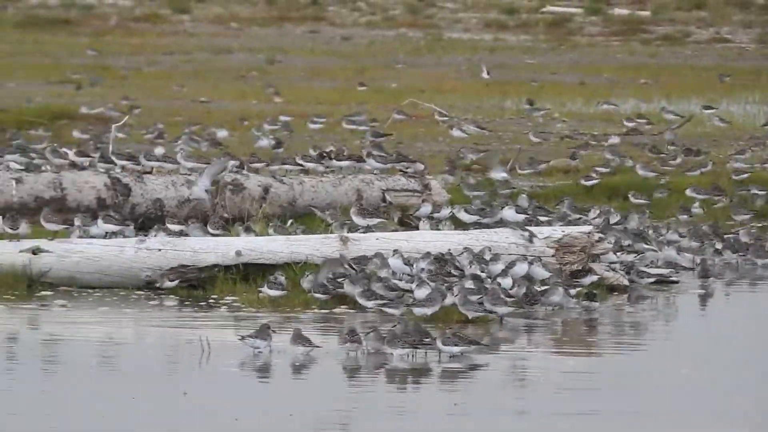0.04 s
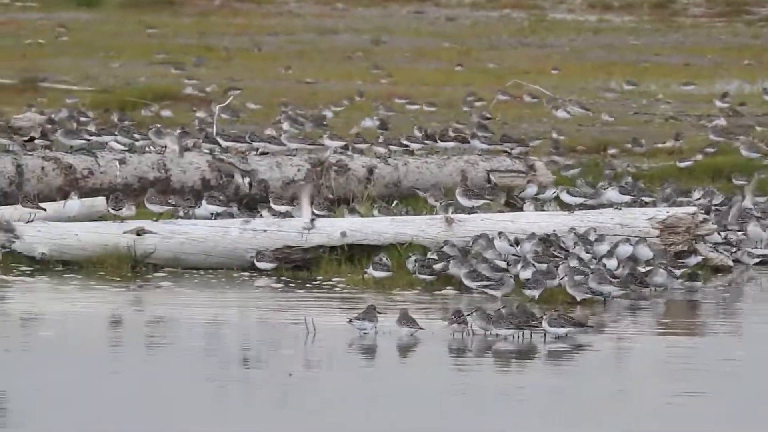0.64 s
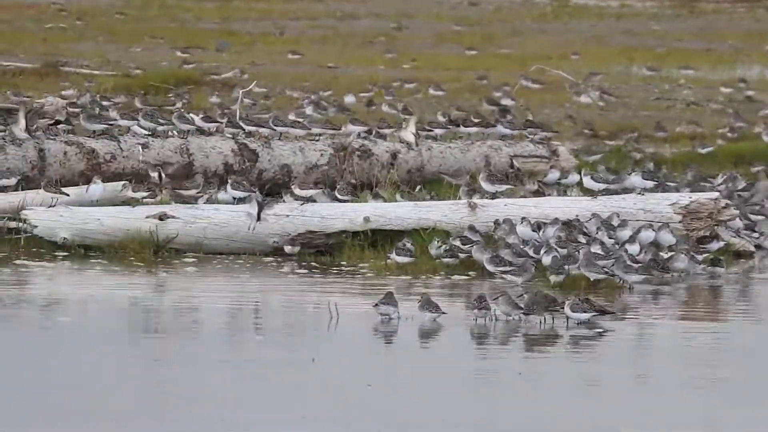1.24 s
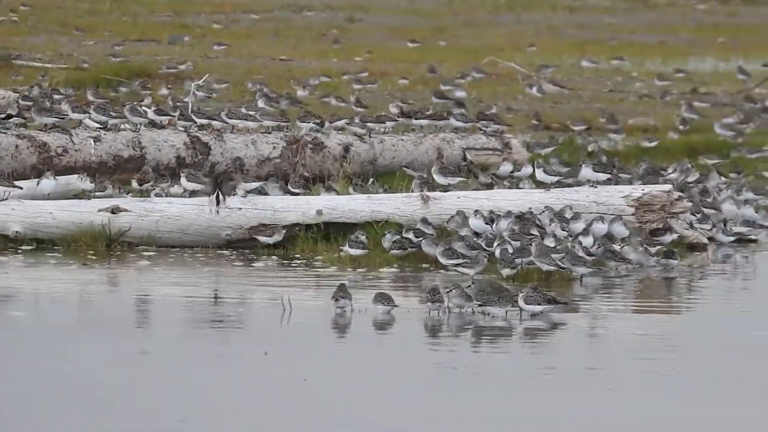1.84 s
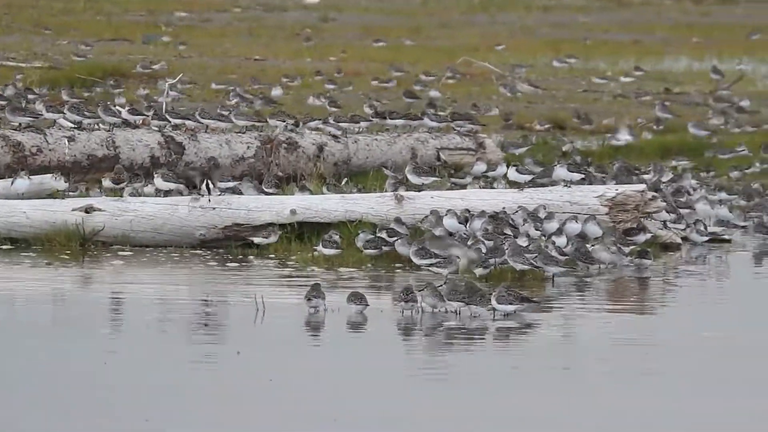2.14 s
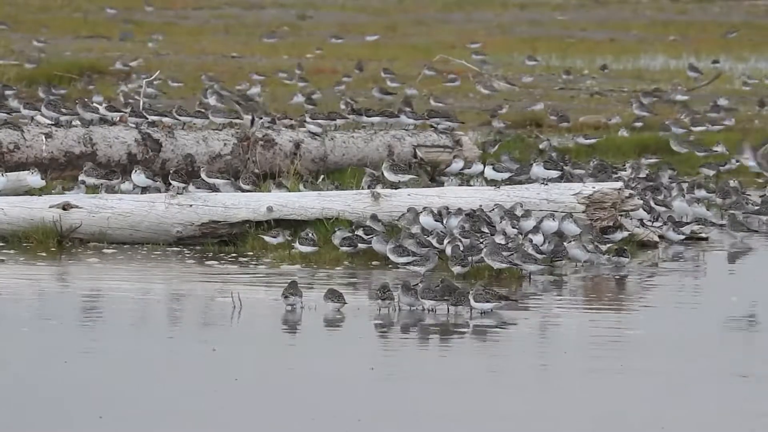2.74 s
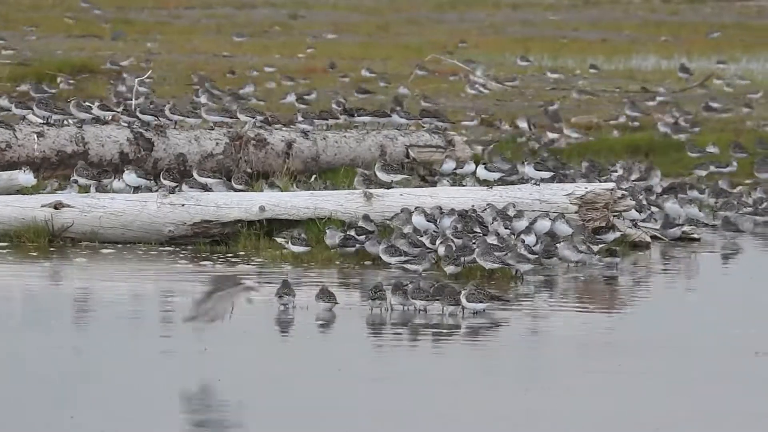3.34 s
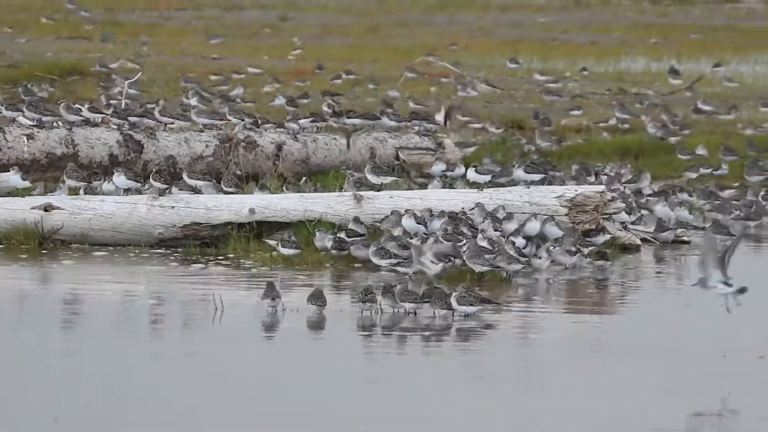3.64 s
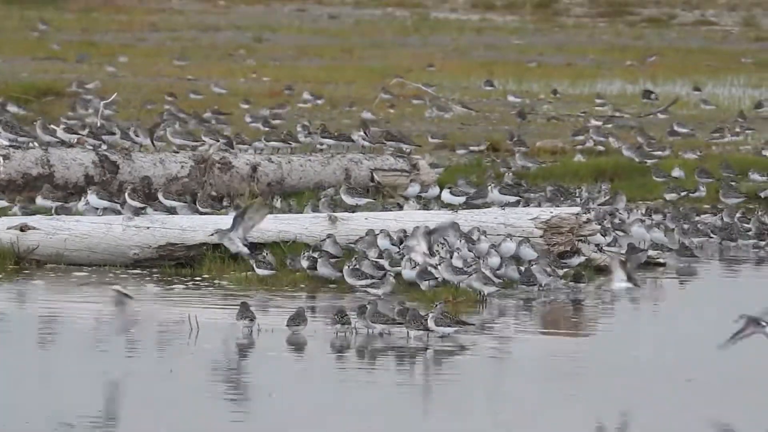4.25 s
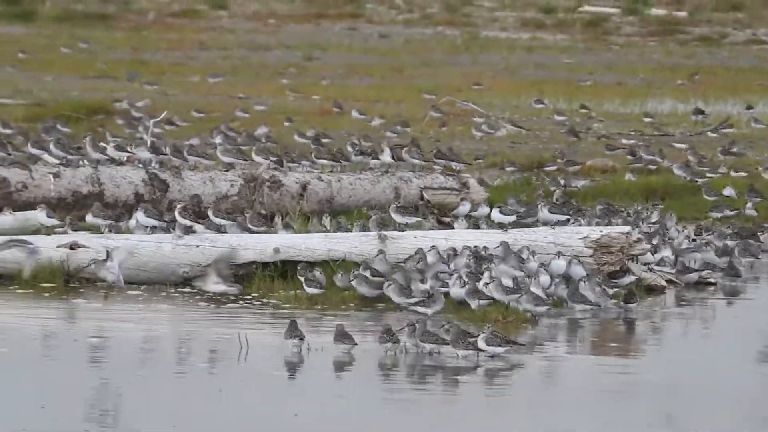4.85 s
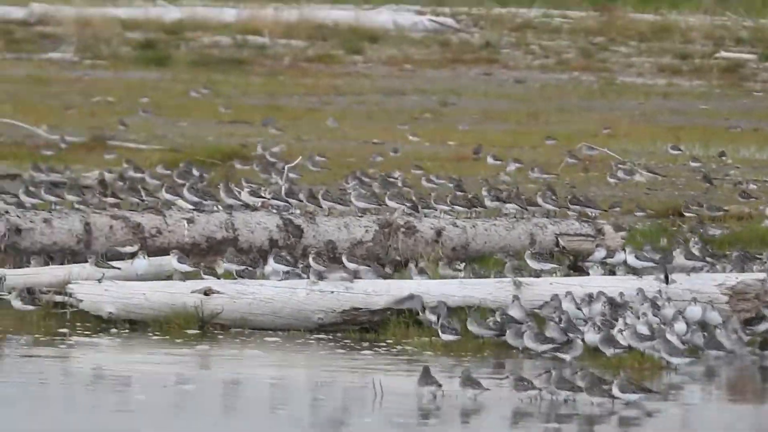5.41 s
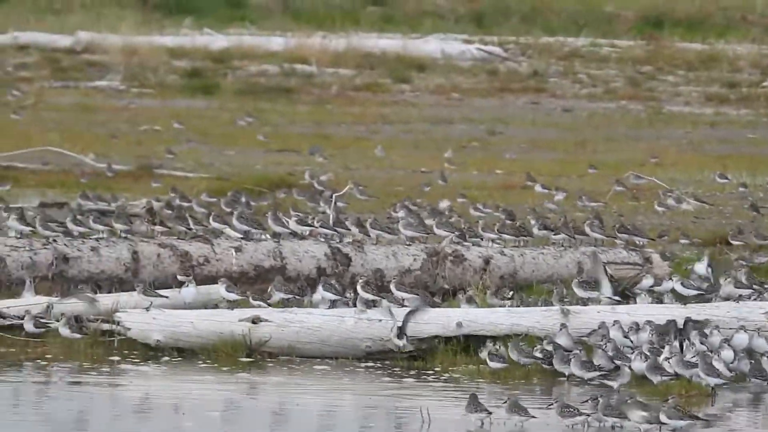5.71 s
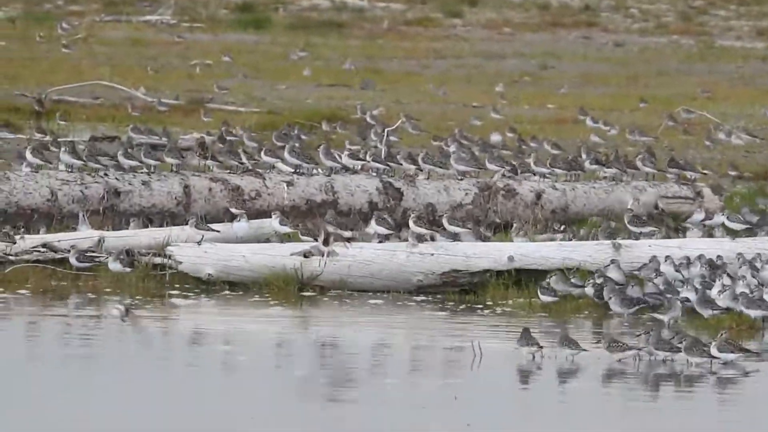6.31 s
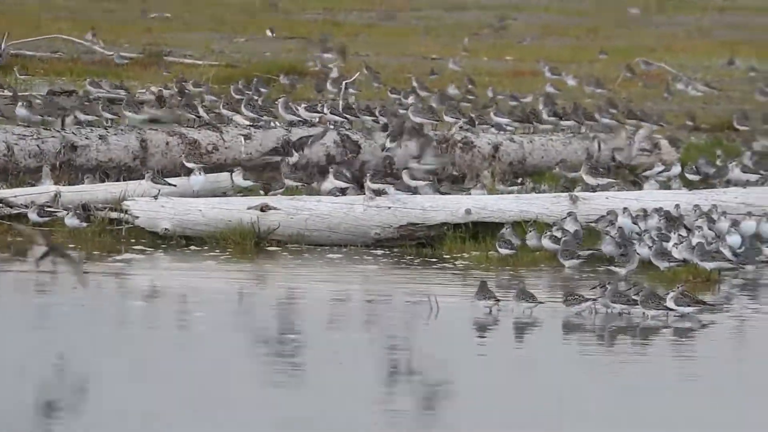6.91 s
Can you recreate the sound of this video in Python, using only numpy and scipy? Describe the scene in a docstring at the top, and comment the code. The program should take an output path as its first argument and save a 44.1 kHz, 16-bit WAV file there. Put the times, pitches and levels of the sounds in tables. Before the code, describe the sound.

Hundreds of small shorebirds twitter continuously on an open marsh shore, with sharp rising chips and soft peeps standing out nearby. About halfway through, a bird rushes past on fluttering wings and the flock grows louder and more excited. Wind rumbles and thumps unevenly on the microphone, building to one strong gust that briefly covers the birds. More wing rushes follow as the chatter continues.

```python
"""A dense roost of small shorebirds twitters on driftwood at a marsh shore. Each call is a near-sine
from the syrinx: rising chips, soft peeps and slurred whistles stand out of the chatter of hundreds.
Birds fly close past, pushing air and hissing through their feathers. Wind eddies buffet the two
microphone ports; the strongest gust makes the gain control duck the flock."""
import sys
import numpy as np
from scipy import signal
from scipy.fft import rfft, irfft
from scipy.io import wavfile
from scipy.ndimage import uniform_filter1d

SR = 44100
rng = np.random.default_rng(int(sys.argv[2]) if len(sys.argv) > 2 else 0)


def store_wav(level_fs):
    """Save 16-bit WAV to argv[1]."""
    pcm = np.round(np.clip(np.atleast_2d(level_fs), -1, 1) * 32767)
    wavfile.write(sys.argv[1], SR, pcm.T.astype(np.int16))


N = 311787
TIME_S = np.arange(N) / SR
BINS_HZ = np.fft.rfftfreq(N, 1 / SR)
SIDES = np.array([[1], [-1]])  # left, right
CHIP_S = .016

# left-right phase of the microphone pair at bearing 1: (frequency [Hz], phase [rad])
PAIR_PHASE = [(1500, 0), (3500, 0.5), (4500, 0.95), (5300, 1.68), (6200, 3.5), (9000, 0), (12000, 3)]
# flock activity: (time [s], high twitter gain [dB], low peeping gain [dB])
FLOCK_ACTIVITY = [(0, -1.5, 2), (1, -1.5, 0), (2.2, -0.5, 2.5), (3.2, -1, 4), (3.6, 4, -1.5),
                  (4.15, 3, 2.5), (4.5, 2.5, 2.5), (5.1, 2, 0.5), (5.5, 3.5, -2.5), (6.3, 2.5, 2.5),
                  (7.07, -1.5, 1)]
# wind strength at the microphone: (time [s], level [dB])
GUST_STRENGTH = [(0, -29.5), (.3, -28.5), (.42, -37), (.72, -33.5), (1.1, -21.5), (1.6, -32.5), (2.65, -26),
                 (3.0, -28.5), (3.6, -26.5), (3.66, -20), (4.05, -21), (4.55, -26), (5.22, -22.5),
                 (5.27, -7), (5.45, -6), (5.53, -21), (5.95, -18.5), (6.11, -27.5), (6.2, -19),
                 (6.7, -22.5), (7.07, -29.5)]


def undb(db):
    """Decibels to gain."""
    return 10 ** (np.asarray(db) / 20)


def unit(x):
    """Scale to rms 1."""
    return x / np.sqrt(np.mean(np.abs(x) ** 2))


def at_hz(table, hz):
    """Interpolate (frequency [Hz], value) on a log-frequency axis."""
    points_hz, values = np.transpose(table)
    return np.interp(np.log(np.maximum(hz, 1)), np.log(points_hz), values)


def curves(table):
    """Columns of a timed table at every sample."""
    times_s, *columns = np.transpose(table)
    return [np.interp(TIME_S, times_s, column) for column in columns]


def add(out, start_s, sound):
    """Mix in a stereo sound."""
    i = int(np.clip(start_s * SR, 0, N - 1))
    out[:, i:i + sound.shape[1]] += sound[:, :N - i]


def progress(length_s):
    """Ramp from 0 to 1."""
    return np.linspace(0, 1, max(int(length_s * SR), 32))


def walk(rate_hz):
    """Random steps, smoothed twice; rms 1."""
    hold = int(SR / rate_hz)
    steps = np.repeat(rng.standard_normal(N // hold + 1), hold)
    return unit(uniform_filter1d(uniform_filter1d(steps, hold), hold)[:N])


def jitter_pair(samples, knot_count):
    """Two random piecewise-linear curves."""
    u, knots = np.linspace(0, 1, samples), np.linspace(0, 1, knot_count)
    return np.array([np.interp(u, knots, row) for row in rng.standard_normal((2, knot_count))])


def noise(spectrum, apart, bearing=1):
    """Coloured stereo noise, rms 1; apart is the power share each port hears alone."""
    white = rfft(rng.standard_normal((3, N)))
    shared = white[2] * np.exp(.5j * SIDES * bearing * at_hz(PAIR_PHASE, BINS_HZ))
    ports = np.sqrt(1 - apart) * shared + np.sqrt(apart) * white[:2]
    return unit(irfft(ports * undb(at_hz(spectrum, BINS_HZ)), N))


def note(hz, db, bearing, rasp=.015):
    """Near-sine from the syrinx along a pitch track, with fast rasp in pitch and level."""
    pitch_jitter, level_jitter = jitter_pair(len(hz), len(hz) // 64 + 3)
    phase = 2 * np.pi * np.cumsum(hz * (1 + rasp * pitch_jitter)) / SR
    swell = signal.windows.tukey(len(hz), .6) * undb(db + 2.5 * level_jitter)
    return swell * np.sin(phase + .5 * SIDES * bearing * at_hz(PAIR_PHASE, hz))


def chip(low_hz, top_hz, db, bearing, length_s, hook, fade_db=3):
    """Note that whips upwards, fading with height; hook is the share spent dipping first."""
    u = progress(length_s)
    rise = np.maximum(u - hook, 0) / (1 - hook)
    dip = np.maximum(hook - u, 0)
    height = rise ** 1.4 + 1.2 * dip ** 1.5
    return note(low_hz + (top_hz - low_hz) * height, db - fade_db * height, bearing)


def peep(length_s, start_hz, end_hz, db, bearing, arch=.038):
    """Gently arched whistle."""
    u = progress(length_s)
    glide_hz = start_hz + (end_hz - start_hz) * u
    return note(glide_hz * (1 + arch * np.sin(np.pi * u) ** 2 - arch / 2), db, bearing)


def roost(chip_count=1900, high_peep_count=460, low_peep_count=850):
    """Hundreds of birds call at random distances and bearings; the furthest blend into hiss."""
    # distant high and low calls: (frequency [Hz], density [dB])
    far_twitter = [(3800, -38), (4300, -0.5), (4800, -0.5), (5800, 4.5), (6600, 1), (7200, -5.5),
                   (8000, -24.5), (10000, -28.5), (15000, -36)]
    far_peeping = [(2200, -20), (2600, -0.5), (2900, -8), (3300, 3), (3550, -13.5), (3900, -9), (4400, -52)]
    # notch and peak between peeps and chips: (frequency [Hz], gain [dB])
    colour = [(3550, 0.5), (3750, 1.5), (3930, -3), (4100, 10.5), (4350, 1)]
    high, low = np.zeros((2, 2, N))
    for when, pitch, sweep, length, hook, far in rng.random((chip_count, 6)):
        hz = 4450 + 2000 * pitch ** .5
        top_hz = min(hz + 100 + 900 * sweep, 7200)
        db = 2.5 * pitch - 11 * far ** .7
        call = chip(hz, top_hz, db, rng.normal(.95, .3), .007 + .01 * length, .65 * hook)
        add(high, when * N / SR, call)
    for when, pitch, sweep, length, far in rng.random((high_peep_count, 5)):
        hz = 4400 + 2200 * pitch ** .7
        db = 3 * pitch - 4 - 13 * far ** .7
        call = peep(.01 + .014 * length, hz, hz + 900 * (sweep - .65), db, rng.normal(.85, .45))
        add(high, when * N / SR, call)
    for when, pitch, sweep, length, far in rng.random((low_peep_count, 5)):
        hz = 3680 - 1150 * pitch ** 1.9
        db = -8 * far ** .6 - 6 * pitch
        call = peep(.012 + .02 * length, hz, hz + 850 * (sweep - .85), db, rng.normal(1, 1))
        add(low, when * N / SR, call)
    high_db, low_db = curves(FLOCK_ACTIVITY)
    twitter = unit(high) + .72 * noise(far_twitter, apart=.35)
    peeping = unit(low) + .8 * noise(far_peeping, apart=.15)
    chatter = twitter * undb(high_db - 34.5) + peeping * undb(low_db - 44)
    return irfft(rfft(chatter) * undb(at_hz(colour, BINS_HZ)), N)


def marsh(level_db=-37.5, drift_db=.5):
    """Steady wash of the open marsh."""
    # ambience: (frequency [Hz], density [dB])
    spectrum = [(60, -5.5), (250, 7.5), (500, 0), (800, -0.5), (1000, 0.5), (1230, -3), (1550, 5),
                (1850, 3.5), (2100, 1.5), (2450, 3.5), (3000, -19), (3500, 0), (4000, -5), (7000, -45),
                (15000, -57)]
    return noise(spectrum, apart=.12) * undb(level_db + drift_db * walk(3.56))


def wind(gain_db=-2.5, eddy_db=4.5, ragged_db=3, brighten=.83, usual_db=-23):
    """Eddies buffet each port; small, high ones come in bursts and grow fastest with the gust."""
    # turbulence at the ports: (frequency [Hz], density [dB])
    buffet = [(25, -46), (60, -15), (90, -18), (125, -3.5), (165, 0.5), (230, -4.5), (300, -9),
              (420, -18.5), (700, -25), (1200, -40), (2500, -51), (9000, -71.5)]
    gust_db, = curves(GUST_STRENGTH)
    port_db = gust_db + 2 * walk(18) + 3 * np.array([walk(45), walk(45)])
    bright_db = brighten * np.minimum(gust_db - usual_db, 5)
    turbulence = rfft(noise(buffet, apart=.67))
    octave = np.clip(np.log2(np.maximum(BINS_HZ, 1) / 170), 0, 2)
    out = 0
    for k in range(3):
        band = irfft(turbulence * np.maximum(1 - np.abs(octave - k), 0), N)
        burst_db = (eddy_db + ragged_db * k / 2) * np.minimum([walk(80), walk(80)], 1)
        out += band * undb(gain_db + port_db + burst_db + np.sqrt(k / 2) * bright_db)
    return out


def squeaks(count=220, lowest_hz=6800, range_hz=1500, excitement=5.6):
    """Thin, very high chips, louder when the flock is excited; the highest are faintest."""
    out = np.zeros((2, N))
    busy_db, _ = curves(FLOCK_ACTIVITY)
    for when, pitch in rng.random((count, 2)):
        i = int(when * N)
        hz = lowest_hz + range_hz * pitch
        db = -47 + excitement * busy_db[i] - 18 * pitch
        add(out, TIME_S[i], chip(hz, hz + 500, db, bearing=.9, length_s=.01, hook=.4))
    return out


def neighbours(count=34, base_hz=5950, base_db=-34):
    """Birds at mid distance chip by turns, each with its own pitch, sweep and level."""
    out = np.zeros((2, N))
    for turn, (when, pitch, loud, sweep, hook) in enumerate(rng.uniform(-1.2, 1, (count, 5))):
        hz = base_hz + 700 * pitch
        start_s = TIME_S[-1] * (turn + .5 + when / 2) / count
        call = chip(hz, hz + 700 + 550 * sweep, base_db + 3 * loud, .9, CHIP_S, .45 + .35 * hook)
        add(out, start_s, call)
    return out


def shore_echo(calls, echo_db, t60_s):
    """Calls plus their brief scatter from logs, bank and water."""
    t = np.arange(SR // 3) / SR
    tail = rng.standard_normal((2, len(t))) * undb(-60 * t / t60_s) * (t > .003)
    echo = signal.fftconvolve(calls, unit(tail) / np.sqrt(len(t)), axes=1)[:, :N]
    return calls + undb(echo_db) * echo


def thump(hz, length_s, db, waver=.11, push=.036):
    """A vortex beats on the ports for a few uneven cycles, harder on one side."""
    u = progress(length_s)
    wobble = jitter_pair(len(u), int(hz * length_s) + 2)
    phase = 2 * np.pi * np.cumsum(hz * (1 + waver * wobble), axis=1) / SR
    balance = 1 + .45 * SIDES * rng.uniform(-1, 1)
    pressure = np.sin(phase) + push * rng.choice([-1, 1])
    return balance * pressure * np.sin(np.pi * u) ** .81 * undb(db)


def vortices(patter_count=110, lowest_hz=300, range_octaves=1.264, patter_s=.011):
    """Hard thumps, plus a patter of small, high ones whose level follows the wind."""
    # hardest vortices: (centre time [s], pitch [Hz], length [s], level [dB])
    thumps = [(0.161, 270, 0.016, -12.5), (0.341, 210, 0.02, -12), (1.371, 151, 0.033, -15),
              (1.866, 184, 0.041, -15.5), (2.507, 162, 0.031, -14.5), (3.285, 384, 0.13, -19.5),
              (3.685, 164.8, 0.049, -7.5), (3.783, 138, 0.021, -9.5), (4.21, 160, 0.11, -22),
              (3.941, 197, 0.017, -9), (4.006, 232.5, 0.082, -9.5), (4.065, 168.7, 0.047, -9.5),
              (4.145, 166, 0.038, -13), (4.29, 151, 0.047, -13), (4.348, 162, 0.03, -14.5),
              (4.905, 174.8, 0.021, -13), (5.137, 172, 0.039, -10), (5.2, 184, 0.028, -8.5),
              (5.26, 187, 0.053, -6.5), (5.385, 367, .16, -1), (5.495, 159, 0.027, -4.5),
              (5.937, 182.6, 0.052, -4.5), (6.183, 199, 0.027, -9), (6.314, 236, 0.018, -10.5)]
    out = np.zeros((2, N))
    gust_db, = curves(GUST_STRENGTH)
    for centre_s, hz, length_s, db in thumps:
        add(out, centre_s - length_s / 2, thump(hz, length_s, db))
    for when, pitch, weak in rng.random((patter_count, 3)):
        i = int(when * N)
        db = gust_db[i] + 4.5 - 5.5 * (weak + pitch)
        add(out, TIME_S[i], thump(lowest_hz * 2 ** (range_octaves * pitch), patter_s, db))
    return out


def near_birds(chip_gain_db=2, chitter_gain_db=5, peep_gain_db=-1, slur_gain_db=-3):
    """Close calls that stand out from the roost."""
    # rising chips: (time [s], lowest pitch [Hz], rise [Hz], level [dB])
    chips = [(0.804, 5230, 1000, -26.5), (.97, 5870, 1400, -19.5), (1.038, 5780, 1500, -18),
             (1.096, 5750, 1600, -21.5), (1.242, 5200, 990, -26), (1.411, 6740, 1400, -31),
             (1.592, 6730, 1200, -33), (1.693, 6130, 800, -25), (2.231, 5760, 1300, -26),
             (2.495, 5960, 1300, -22.5), (3.147, 5200, 1100, -28.5), (4.001, 5440, 700, -20),
             (4.374, 5860, 1460, -14), (4.692, 5980, 800, -20), (5.161, 5950, 600, -25),
             (6.227, 4300, 500, -27), (6.312, 4300, 500, -30.5), (6.351, 5780, 700, -19.5),
             (6.406, 4420, 298, -28), (6.548, 4950, 400, -29), (6.597, 4840, 500, -29.5),
             (6.742, 6180, 600, -20), (6.894, 5680, 900, -14.5)]
    # one bird's run of hooked notes: (time [s], lowest pitch [Hz], level [dB])
    chitter = [(3.263, 5640, -25.5), (3.482, 5500, -24.5), (3.541, 5470, -24.5), (3.596, 5520, -23),
               (3.648, 5360, -23), (3.746, 5640, -17), (3.803, 6740, -22), (3.873, 6260, -21)]
    # plain peeps: (time [s], length [s], start pitch [Hz], end pitch [Hz], level [dB])
    peeps = [(0.231, 0.049, 3320, 3310, -32), (.952, 0.025, 3580, 3230, -30),
             (1.13, 0.036, 6500, 5050, -26.5), (1.21, 0.033, 3500, 3140, -26.5),
             (1.492, 0.035, 3460, 3170, -28), (2.149, 0.019, 3600, 3150, -24.5),
             (2.213, 0.027, 3720, 3180, -27.5), (4.753, 0.036, 5320, 5600, -25),
             (4.96, 0.021, 5410, 5440, -28), (5.205, 0.064, 5420, 5450, -28.5),
             (6.04, 0.056, 3610, 3570, -31.5), (6.197, 0.014, 6300, 5870, -29),
             (6.277, 0.011, 6300, 6000, -24), (6.316, 0.034, 3600, 3540, -33.5),
             (6.456, 0.014, 6100, 6330, -24.5), (6.507, .03, 3400, 3560, -31.5),
             (6.628, 0.016, 6000, 6400, -23.5), (6.683, 0.046, 2710, 2890, -30.5)]
    # slurred whistles, by 2nd harmonic: (time [s], length [s], start pitch [Hz], rise [Hz], level [dB])
    slurs = [(3.67, 0.077, 3080, 393, -26.5), (4.143, 0.085, 3560, 139, -26.5),
             (4.278, 0.097, 3180, 522, -30.5), (4.613, 0.087, 3220, 407, -29.5),
             (4.897, 0.12, 3100, 267, -33.5), (5.123, 0.063, 4110, 150, -29.5)]
    # slur partials: (harmonic number, gain [dB])
    slur_harmonics = [(2, 0), (3, -5)]
    out = np.zeros((2, N))
    for time_s, hz, rise_hz, db in chips:
        bearing = rng.normal(.9, .2)
        length_s = CHIP_S * rng.uniform(.8, 1.2)
        add(out, time_s - .007, chip(hz, hz + rise_hz, db + chip_gain_db, bearing, length_s, hook=.25))
    for time_s, hz, db in chitter:
        call = chip(hz, 8610, db + chitter_gain_db, bearing=.4, length_s=.0145, hook=.6, fade_db=0)
        add(out, time_s - .008, call)
    for time_s, length_s, start_hz, end_hz, db in peeps:
        add(out, time_s, peep(length_s, start_hz, end_hz, db + peep_gain_db, rng.normal(.37, .1)))
    for time_s, length_s, start_hz, rise_hz, db in slurs:
        hz = start_hz + rise_hz * np.sin(1.75 * progress(length_s)) ** 2  # climbs, levels off
        for k, harmonic_db in slur_harmonics:
            add(out, time_s, note(hz * k / 2, db + slur_gain_db + harmonic_db, bearing=.13, rasp=.026))
    return out


def pips(count=30, from_s=.75, to_s=3.2, base_hz=3480, fall_hz=420, length_s=.0213, base_db=-32.5):
    """One bird's run of quick falling pips before the flock stirs."""
    out = np.zeros((2, N))
    for turn, (when, pitch, loud) in enumerate(rng.uniform(-1.1, 1, (count, 3))):
        hz = base_hz + 160 * pitch
        start_s = from_s + (to_s - from_s) * (turn + when / 3) / count
        add(out, start_s, peep(length_s, hz, hz - fall_hz, base_db + 2 * loud, bearing=.6))
    return out


def wings(beat_hz=17, flick_sigma_s=.0009, rush_decay_s=.13):
    """Passing birds push air and hiss through their feathers, pulsing lightly with the wingbeat."""
    # fly-bys: (nearest time [s], approach sigma [s], retreat sigma [s], air level [dB],
    # hiss level [dB], hiss left minus right [dB], unshared air power [0-1])
    passes = [(1.072, 0.055, 0.026, -26, -35.5, -2, 0.048), (3.351, 0.063, 0.071, -18, -23.5, 0.5, 0.053),
              (5.735, 0.076, 0.15, -24, -28.5, 13, 0.41), (6.173, 0.033, 0.024, -21, -30, 5, 0.33),
              (6.9, 0.046, 0.043, -26.5, -35.5, 1, 0.088)]
    # wing-tip flicks, each opening a rush: (time [s], level [dB], rush [dB], left minus right [dB])
    flicks = [(3.321, -14, -32, -3), (5.572, -16.5, -32.5, 13)]
    # pushed air and feather hiss: (frequency [Hz], density [dB])
    air_spectrum = [(90, -32), (180, -23), (350, -2), (700, -10), (1100, -14), (1750, -14.5), (2100, -18.5),
                    (2800, -25.5), (3300, -17.5), (4000, -38), (8000, -63)]
    hiss_spectrum = [(2500, -14), (4000, -6.5), (5000, -2.5), (6200, 4.5), (7000, -1.5), (8200, -8.5),
                     (10000, -23), (15000, -50)]
    beat = undb(.7 * np.sin(2 * np.pi * beat_hz * TIME_S + walk(5)) + .8 * walk(200))
    feathers = noise(hiss_spectrum, apart=.75, bearing=.13)
    snap = noise(hiss_spectrum, apart=.69, bearing=0) + undb(-8) * noise(air_spectrum, apart=.077)
    out = 0
    for time_s, db, rush_db, pan_db in flicks:
        t = TIME_S - time_s
        flick = undb(db) * np.exp(-.5 * (t / flick_sigma_s) ** 2)
        rush = undb(rush_db) * (t > 0) * np.exp(-np.abs(t) / rush_decay_s)
        out += undb(SIDES * pan_db / 2) * (flick * snap + rush * beat * feathers)
    for time_s, approach_s, retreat_s, air_db, hiss_db, pan_db, apart in passes:
        t = TIME_S - time_s
        nearness = np.exp(-.5 * (t / np.where(t < 0, approach_s, retreat_s)) ** 2)
        air = undb(air_db) * noise(air_spectrum, apart)
        hiss = undb(hiss_db + SIDES * pan_db / 2) * feathers
        out += nearness * beat * (air + hiss)
    return out


def knocks(puff_db=-6.5, attack_s=.0055, decay_s=.007, octaves=.33, crackle_db=-10.5, crackle_s=.0025):
    """Small eddies brush the ports: a soft, unpitched puff and a pinch of crackle each."""
    # eddies: (peak time [s], band centre [Hz], level [dB])
    eddies = [(3.653, 555, -13.5), (3.765, 690, -16.5), (3.818, 480, -11.5), (3.872, 524, -12.5),
              (3.938, 392, -15), (4.026, 524, -18.5), (4.053, 497, -13), (4.143, 620, -14.5),
              (4.268, 418, -19), (4.633, 495, -15), (4.938, 503, -19), (5.126, 403, -13.5),
              (5.285, 470, -10), (5.309, 523, -7), (5.332, 400, -5), (5.361, 480, 3), (5.392, 520, -1.5),
              (5.411, 470, 0.5), (5.467, 440, -2), (5.499, 407, -10.5), (5.944, 654, -8.5),
              (6.247, 860, -13.5), (6.262, 670, -10), (6.388, 870, -15), (6.435, 454, -14)]
    # eddy crackle: (frequency [Hz], density [dB])
    crackle_spectrum = [(100, -15), (500, -2), (1200, -6), (2000, -19), (4000, -31), (15000, -50)]
    out = np.zeros((2, N))
    t = np.arange(-SR // 30, SR // 20) / SR
    bins_hz = np.maximum(np.fft.rfftfreq(len(t), 1 / SR), 1)
    swell = np.exp(np.minimum(t / attack_s, -t / decay_s))
    crackle = noise(crackle_spectrum, apart=.66)
    for peak_s, hz, db in eddies:
        i = int(peak_s * SR)
        white = rfft(rng.standard_normal((3, len(t))))
        band = np.exp(-.5 * (np.log2(bins_hz / hz) / octaves) ** 2)
        puff = swell * irfft((white[:2] + white[2]) * band, len(t))
        puff = unit(puff) * np.sqrt(np.mean(swell ** 2))
        pinch = crackle[:, i:i + len(t)] * np.exp(-np.abs(t) / crackle_s)
        add(out, peak_s + t[0], (undb(puff_db) * puff + undb(crackle_db) * pinch) * undb(db))
    return out


def scene():
    """Flock, wings and wind over the marsh."""
    wash = marsh()
    further = shore_echo(neighbours(), echo_db=-5, t60_s=.06)
    close = shore_echo(near_birds() + pips() + squeaks(), echo_db=-9, t60_s=.026)
    return close + further + roost() + knocks() + wings() + wind() + vortices() + wash


def record(dry, threshold_db=-14, ratio=6, window_s=.081, ceiling=.95, cutoff_hz=15400):
    """Gain control ducks the loudest gusts; soft clip, then low-pass."""
    power = uniform_filter1d(np.mean(dry ** 2, axis=0), int(window_s * SR))
    over_db = np.maximum(10 * np.log10(np.abs(power) + 1e-12) - threshold_db, 0)
    held = dry * undb(-over_db * (1 - 1 / ratio))
    rounded = held / (1 + (held / ceiling) ** 8) ** .125
    return signal.sosfilt(signal.ellip(8, .2, 70, cutoff_hz, fs=SR, output="sos"), rounded)


dry = scene()
out = record(dry)
store_wav(out)
```